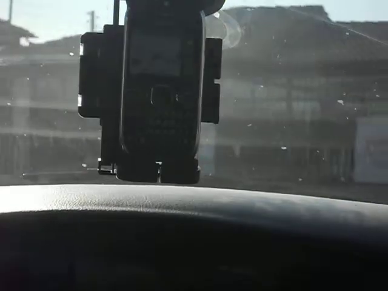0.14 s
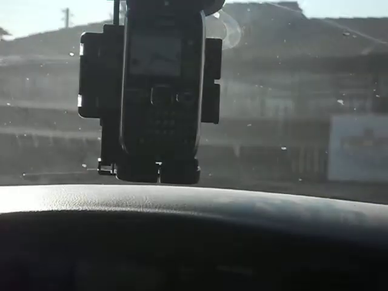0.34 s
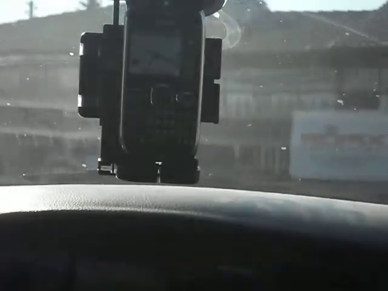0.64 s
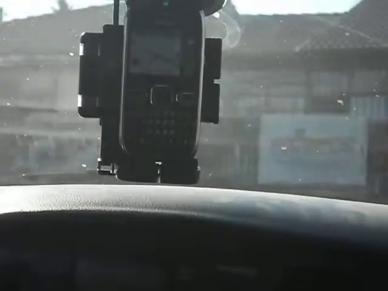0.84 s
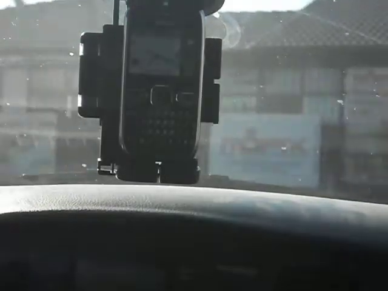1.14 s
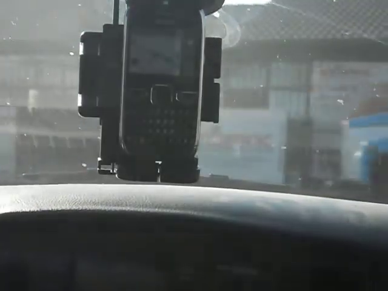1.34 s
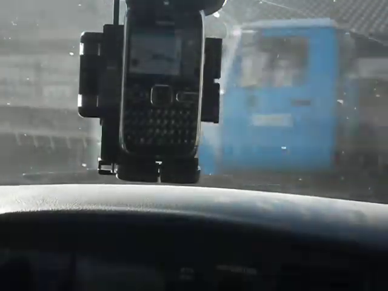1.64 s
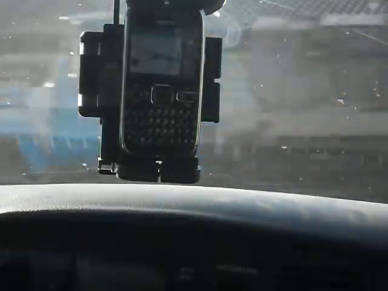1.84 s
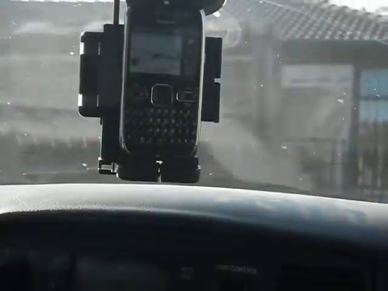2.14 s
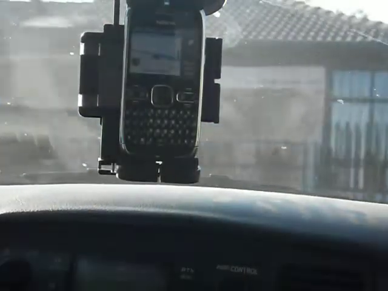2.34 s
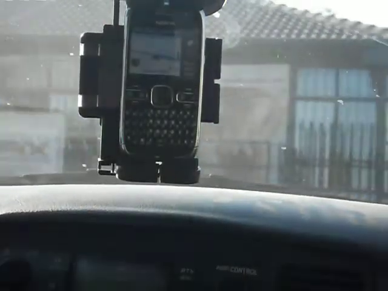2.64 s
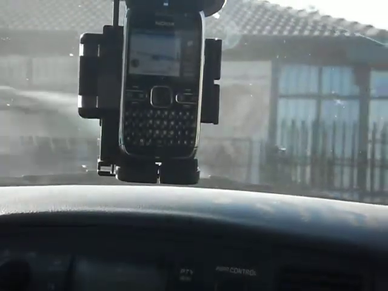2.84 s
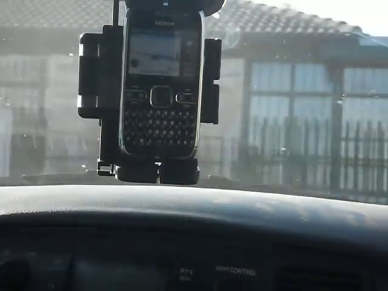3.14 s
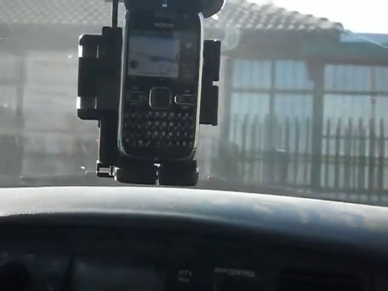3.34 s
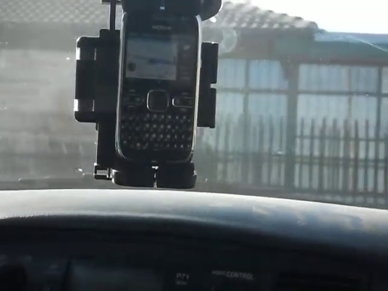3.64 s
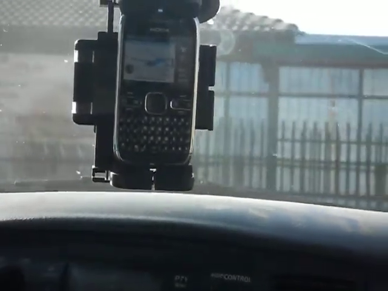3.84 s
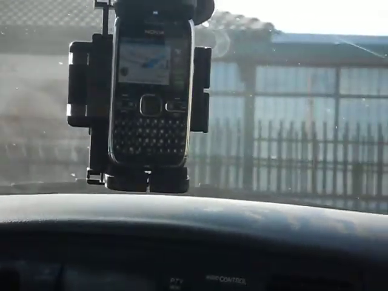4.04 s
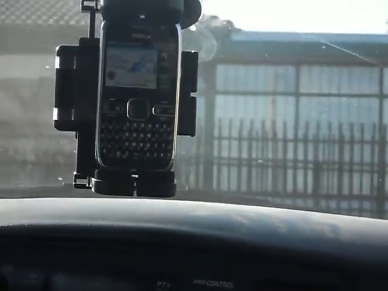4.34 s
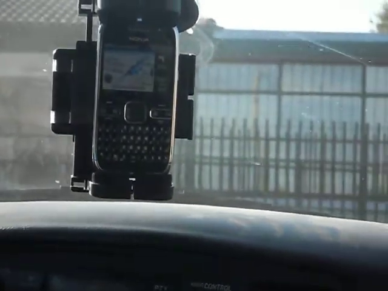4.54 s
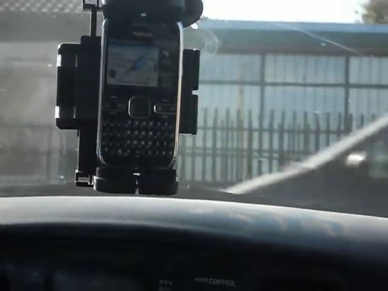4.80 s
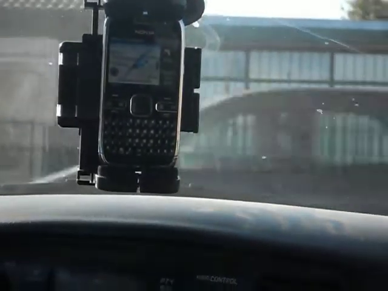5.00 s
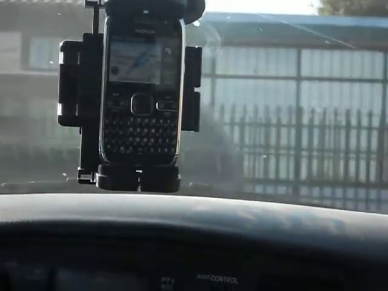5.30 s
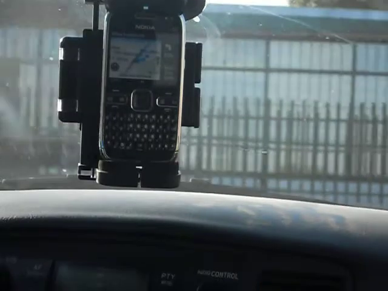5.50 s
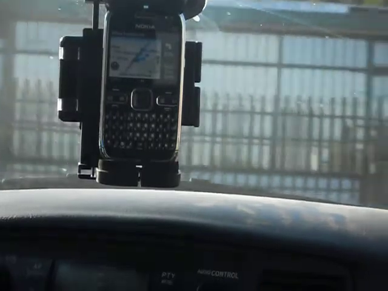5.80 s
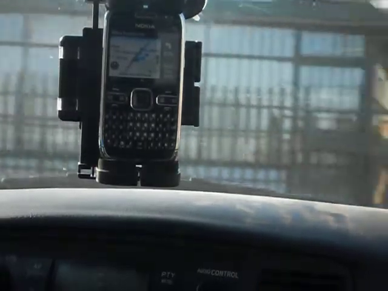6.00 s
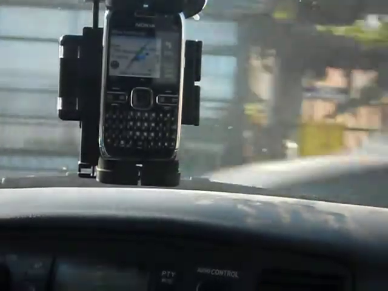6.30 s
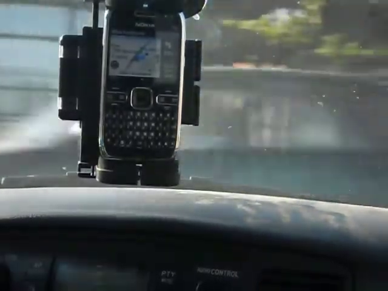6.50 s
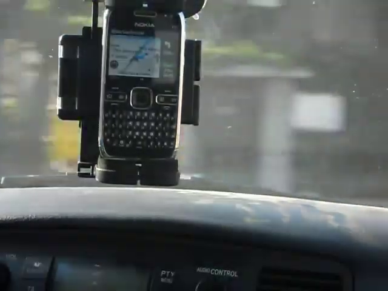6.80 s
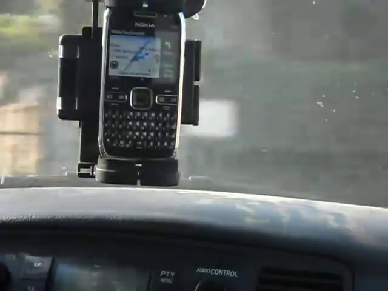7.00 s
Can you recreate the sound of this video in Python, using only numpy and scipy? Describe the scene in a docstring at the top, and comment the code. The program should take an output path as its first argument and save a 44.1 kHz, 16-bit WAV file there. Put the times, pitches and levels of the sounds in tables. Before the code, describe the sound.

Inside a slow-moving car, an engine drones near idle over low road rumble and light tyre hiss. A turn signal ticks faintly and evenly throughout, and small loose things knock about. Dips bring deep thuds in the first second, followed by a suspension thump at 1.3 seconds and a sharp plastic click at 1.7. From about 2 to 4 seconds the ride is at its busiest, with thumps, dashboard taps, flurries of rattles and hollow clonks near 2.9, 3.3 and 3.7 seconds. The engine revs gently from 3 to 3.8 seconds, eases, then pulls harder from 4.5 to about 5.5, where another sharp click sounds. Between 6 and 6.5 seconds a deep engine boom fills the cabin and pushes the overall level down slightly. The engine is climbing again at the end, around 7 seconds.

```python
"""Slow turn on a rough street

Inside a car, a four-cylinder engine lugs near idle, revs twice and booms in the cabin.
The road rumbles through the body and the tyres hiss; the indicator relay ticks on and off.
Bumps thump the suspension and shake clonks, rattles, taps and clicks out of the trim.
An automatic gain control ducks everything when the engine booms, and recovers slowly."""
import sys
import numpy as np
from scipy import signal
from scipy.fft import rfft, irfft, next_fast_len
from scipy.io import wavfile
from scipy.ndimage import map_coordinates

SR = 44100
rng = np.random.default_rng(int(sys.argv[2]) if len(sys.argv) > 2 else 0)


def to_wav(s):
    """Save 16-bit WAV."""
    ch = np.atleast_2d(s).T  # columns
    pcm = np.round(np.clip(ch, -1, 1) * 32767)  # PCM
    wavfile.write(sys.argv[1], SR, pcm.astype(np.int16))


N = 315315

# how rough the street is under the wheels: time_s, unevenness_db
UNEVENNESS = [(0, -1.5), (.6, 4), (1.3, 2.5), (1.75, 0.5), (2.3, 1), (2.9, -2.5), (3.3, 2), (3.8, -4),
              (4.08, -10), (4.3, -4.5), (4.6, -2.5), (5.3, -8.5), (5.9, -0.5), (6.2, 2.5), (7.15, -1)]


def engine():
    """Each firing pushes the cabin air; combustion noise comes through the bulkhead."""
    # engine speed: time_s, firing_hz
    speed = [(0, 25.2), (1.4, 26.6), (2.85, 26.2), (3.05, 28.8), (3.4, 34.8), (3.76, 40), (4.04, 31),
             (4.4, 28.2), (4.82, 40.5), (5.1, 43.8), (5.38, 41.3), (5.6, 37.2), (5.8, 30), (6.05, 27),
             (6.5, 31), (7.15, 37.6)]
    # how hard the engine works: time_s, level_db
    effort = [(0, -40), (.9, -37), (1.8, -39), (2.2, -36), (3.1, -38.5), (3.4, -34), (3.75, -34.5),
              (4.1, -39), (4.35, -37), (4.75, -31.5), (5.3, -31.5), (6.1, -35.5), (6.7, -33.5), (7.15, -30)]
    # low cabin boom at the firing rate, swelling with road jolts early on
    # and as the engine pulls later: time_s, level_db
    boom_envelope = [(0, -25.5), (.22, -10), (.48, -19), (.82, -11.5), (1.1, -24.5), (1.42, -15.5),
                     (1.8, -25.5), (2.2, -27), (2.38, -10), (2.6, -20.5), (2.9, -17), (3.05, -28),
                     (3.45, -13), (3.57, -21), (3.8, -14), (4, -26), (4.13, -14), (4.42, -27.5),
                     (4.8, -11.5), (5.12, -13.5), (5.45, -9.5), (5.97, -24), (6.03, -6.5), (6.4, -0.5),
                     (6.76, -19), (7.15, -9)]
    # tone of the roar: frequency_hz, level_db
    roar_spectrum = [(100, -22), (190, 0), (305, -5), (355, -2), (420, -2.5), (465, 1), (492, 2),
                     (530, 1.5), (610, -5.5), (665, -2.5), (715, -6.5), (775, -0.5), (840, -13),
                     (1100, -25.5), (1700, -15), (2000, -28.5), (5000, -61), (12000, -91)]
    # engine bay resonances: pitch_hz, width_hz, level_db
    bay_modes = [(750, 120, 2), (1239, 63, -1), (1573, 52, -5.5), (1730, 190, -11)]
    firing_hz, = curves(speed)
    effort_db, = curves(effort)
    boom_db, = curves(boom_envelope)
    uneven_db, = curves(UNEVENNESS)
    phase = 2 * np.pi * np.cumsum(firing_hz) / SR
    rev_octaves = np.log2(firing_hz / firing_hz.mean())
    flutter_db = 1.5 * amp(uneven_db) * wobble(8)
    boom = amp(boom_db + flutter_db) * unit(np.sin(phase))
    drone = amp(effort_db - 4 + 6 * rev_octaves) * exhaust(phase, firing_hz)
    # as the revs climb, the surge hardens and the bay rings harder
    growl = combustion(phase, repeat=.35, knock_db=-7 + 5 * rev_octaves)
    roar = amp(effort_db + 3 + .5 * rev_octaves + .22 * wobble(8.1)) * coloured(growl, roar_spectrum)
    bay = unit(resonate(combustion(phase, repeat=.27, knock_db=-3), bay_modes))
    clatter = amp(effort_db - 12.5 + 10 * rev_octaves) * bay
    easing_db = effort_db - effort_db.max()  # the knocks fade twice as fast as the effort
    knocks = amp(effort_db - 8.5 + easing_db) * thrum(phase)
    return boom + drone + roar + knocks + clatter


def exhaust(phase, firing_hz):
    """The exhaust drones; air modes of the cabin lift each overtone that passes through them."""
    # drone partials: firing_multiple, level_db
    partials = [(.5, 10), (1.5, 0), (2, -3), (2.5, -33), (3, -0.5), (3.5, -32), (4, 0.5), (5, -10),
                (6, -16.5)]
    # cabin air modes: pitch_hz, width_hz, lift_db
    air_modes = [(53.4, 9, 6), (104.4, 5, 8), (189, 12, 5.5)]
    out = np.zeros(N)
    for multiple, level_db in partials:
        hz = multiple * firing_hz
        lift_db = sum(db / (1 + ((hz - mode_hz) / width) ** 2) for mode_hz, width, db in air_modes)
        waver_db = 1.4 * wobble(11)  # no two firings are quite alike
        tone = np.sin(multiple * phase + rng.uniform(0, 2 * np.pi) + .18 * wobble(12))
        out += amp(level_db + lift_db + waver_db) * unit(tone)
    return out


def combustion(phase, repeat, knock_db):
    """Combustion noise: a share repeats every four firings, and it surges once a crank turn."""
    cycle = phase / (8 * np.pi) % 1
    crank_turn = phase / (4 * np.pi) % 1
    pattern = map_coordinates(rng.standard_normal(512), [cycle * 512], mode='grid-wrap')
    fresh = wobble(5000)
    surge = 1 + amp(knock_db) * np.exp(-crank_turn / .09)
    firing_pulse = amp(1.3 * np.cos(phase))
    return (np.sqrt(repeat) * pattern + np.sqrt(1 - repeat) * fresh) * surge * firing_pulse


def thrum(phase):
    """Over the four firings of an engine cycle, each knock rings its own panel of the bulkhead."""
    # knocks in one cycle: position_firings, pitch_hz, width_hz, level_db
    panels = [(.3, 1220, 50, -9), (1.3, 492, 55, -.5), (2.8, 772, 65, 2), (1.9, 665, 60, -4),
              (3.0, 360, 50, 6), (3.9, 425, 60, 0), (3.4, 860, 110, -10)]
    out = np.zeros(N)
    for position, hz, width, db in panels:
        cycle_count = np.floor(phase / (8 * np.pi) - position / 4)
        knocks = np.diff(cycle_count, prepend=-1) * amp(1.5 * wobble(11))
        out += amp(db) * band(knocks, hz, width)
    return out


def road():
    """Uneven tarmac shakes the body; the tread crunches grit and hisses steadily."""
    # tone of the body's shudder and rumble, the grit and the tread: frequency_hz, level_db
    shudder_spectrum = [(12, -2), (24, 1.5), (36, -2.5), (48, 5), (61, -1), (76, -6), (130, -17.5),
                        (400, -120)]
    rumble_spectrum = [(45, -28), (78, 3), (92, -2.5), (102, 3), (116, -7), (160, -5.5), (195, -8),
                       (280, -16), (500, -50), (2000, -110)]
    grit_spectrum = [(300, -44), (700, 2.5), (1000, 0), (1400, -4.5), (2000, -7), (3000, -11),
                     (6000, -22.5), (12000, -69)]
    hiss_spectrum = [(500, -0.5), (1700, 3), (3000, 2.5), (4200, 2.1), (6000, 0.5), (8000, 0),
                     (10000, -2.5), (12000, -9)]
    uneven_db, = curves(UNEVENNESS)
    shudder = amp(-20 + uneven_db + 1.2 * wobble(7)) * coloured(noise(), shudder_spectrum)
    rumble = amp(-28.5 + .41 * uneven_db + 1.66 * wobble(14)) * coloured(noise(), rumble_spectrum)
    grit_db = -44 + .11 * uneven_db + 1.34 * wobble(25)
    grit = amp(grit_db) * coloured(noise() * amp(2.5 * wobble(400)), grit_spectrum)
    hiss = amp(-44.5 + .76 * wobble(54)) * coloured(noise(), hiss_spectrum)
    return shudder + rumble + grit + hiss


def bumps():
    """Dips in the road heave the body; potholes thump the suspension."""
    # body heaves: middle_s, level_db, pitch_hz
    heaves = [(.19, -9.5, 51.6), (0.331, -10.5, 51.5), (.74, -16, 50.1), (1.0, -14.5, 56.2),
              (1.26, -10, 48.6), (2.15, -15.5, 59.6), (2.36, -18.5, 57.6), (2.531, -16.5, 56.4),
              (3.2, -14, 54.8), (3.301, -8.5, 28.55), (3.71, -8, 27.4), (4.222, -13.5, 53.7),
              (4.421, -15.5, 56.5), (5.999, -12.5, 52.8)]
    # suspension thumps: start_s, level_db, pitch_hz
    thumps = [(1.324, -11, 145), (2.163, -16, 258), (2.166, -23, 345), (2.168, -20, 150), (2.68, -22, 175),
              (2.872, -15, 132), (2.902, -15, 135), (2.955, -23, 280), (3.02, -26, 290), (3.560, -15, 185),
              (3.70, -20, 185)]
    out = np.zeros(N)
    heave_s = .2013
    t = np.arange(int(heave_s * SR)) / SR
    for middle, db, hz in heaves:
        heave = np.hanning(len(t)) * np.sin(2 * np.pi * (hz * t + rng.random()))
        add(out, middle - heave_s / 2, amp(db) * heave)
    for start, db, hz in thumps:
        thud = contact([(2 * hz, 2 * hz, 0)], chatter_s=.0065, soft_hz=2500)
        add(out, start, amp(db) * (ring(hz, rise_s=.0045) + amp(-11.5) * thud))
    return out


def clonks():
    """A hollow loose part lands with a dull clonk and bounces once, softer and a little higher."""
    # landings: start_s, level_db, pitch_hz
    landings = [(2.873, -16, 540), (2.892, -17, 540), (2.899, -14, 590), (3.3395, -6.5, 615),
                (3.6803, -6, 615)]
    # modes of the hollow part: pitch_multiple, level_db
    modes = [(1, 0), (1.35, -12), (2.25, -26), (2.9, -26)]
    bounce_s, bounce_db, bounce_pitch_ratio = .00815, -6, 1.14
    out = np.zeros(N)
    blow = lambda hz: sum(amp(db) * ring(k * hz, rise_s=.0024, padding=3) for k, db in modes)
    for start, db, hz in landings:
        add(out, start, amp(db) * blow(hz))
        add(out, start + bounce_s, amp(db + bounce_db) * blow(bounce_pitch_ratio * hz))
    return out


def trim():
    """Dashboard plastic taps, clicks and rubs as the body flexes."""
    # taps, each a close pair of modes: start_s, level_db, lower_mode_hz
    taps = [(.751, -28, 900), (1.33, -29, 600), (1.717, -27, 660), (2.231, -26, 800), (2.635, -28, 1080),
            (2.66, -30, 700), (2.874, -29, 1300), (3.080, -30, 620), (3.095, -31, 720), (3.1422, -18, 880),
            (3.564, -22, 780), (3.8635, -27, 850), (4.517, -27, 920)]
    # sharp clicks, each ringing a panel: start_s, level_db, chatter_s, panel_hz, panel_db, panel_rise_s
    clicks = [(1.7152, -8, .003, 1950, -26, .0013), (2.232, -26, .0022, 1450, -31, .0012),
              (2.825, -28.5, .003, 1600, -38, .0018), (3.203, -19, .003, 2700, -34, .0008),
              (3.564, -20, .0009, 2400, -23, .0003), (3.8635, -21, .001, 3000, -21, .0002),
              (4.066, -29, .0035, 1900, -44, .0018), (4.213, -28, .0035, 1900, -50, .0018),
              (4.420, -30, .0035, 1900, -48, .0018), (5.4407, -9, .004, 1820, -20, .0015)]
    # bright ring of a click: pitch_hz, width_hz, level_db
    click_modes = [(2900, 570, -3.5), (4670, 1100, 1), (5530, 720, 3.5), (6450, 570, -3.5),
                   (8700, 1900, -10.5)]
    # trim rubbing on trim: start_s, length_s, level_db
    rubs = [(2.197, 0.049, -42), (2.795, 0.091, -39.5), (2.88, .045, -38), (4.052, 0.056, -36.5),
            (4.23, 0.066, -40), (4.392, 0.056, -38.5), (5.355, 0.095, -39.5), (5.699, 0.2, -43)]
    # tone of a rub: frequency_hz, level_db
    rub_spectrum = [(600, 0), (1500, 1.5), (4000, 1.5), (7000, -1), (11000, -8)]
    out = np.zeros(N)
    for start, db, hz in taps:
        pair = ring(hz, rise_s=.0011) - ring(1.3 * hz, rise_s=.0011)
        clack = contact([(hz, hz, 0)], chatter_s=.0027, soft_hz=4000)
        add(out, start, amp(db) * (pair + amp(-3.5) * clack))
    for start, db, chatter_s, panel_hz, panel_db, rise_s in clicks:
        add(out, start, amp(db - 10) * contact(click_modes, chatter_s, soft_hz=20000))
        add(out, start, amp(panel_db) * ring(panel_hz, rise_s))
    for start, length, db in rubs:
        stroke = np.hanning(int(length * SR))
        slips = (noise() * amp(.74 * wobble(240)))[:len(stroke)]
        add(out, start, amp(db) * stroke * coloured(slips, rub_spectrum))
    return out


def indicator():
    """Once a blink the relay closes and opens again, with a different ring each way."""
    # relay frame modes on closing and on opening: pitch_hz, level_db, rise_s
    closing_modes = [(2925, 1.5, 0.0037), (4114, -7, 0.004), (5270, -4, 0.002), (6250, -6, 0.003),
                     (6750, -2, 0.0022)]
    opening_modes = [(2920, -4.5, 0.0033), (3660, -12, 0.004), (5410, -.3, 0.0024), (8400, -11, .002),
                     (8860, -6.5, 0.002)]
    first_s, period_s, lamp_on_s = .0667, .7077, .3771
    closing_db, opening_db, scatter_db = -37, -35.5, 1
    out = np.zeros(N)
    for start in np.arange(first_s, N / SR, period_s):
        closing = relay_tick(closing_modes, chatter_db=.5, chatter_s=.0035)
        opening = relay_tick(opening_modes, chatter_db=-1.5, chatter_s=.003)
        add(out, start, amp(rng.normal(closing_db, scatter_db)) * closing)
        add(out, start + lamp_on_s, amp(rng.normal(opening_db, scatter_db)) * opening)
    return out


def relay_tick(modes, chatter_db, chatter_s):
    """The armature chatters against its stop and rings the relay frame."""
    # tone of the chattering contacts: frequency_hz, level_db
    chatter_spectrum = [(1800, -19), (2700, 0), (4500, -4.5), (6600, -4.5), (7300, -11), (10000, -11.5)]
    t = np.arange(SR // 15) / SR
    tone = lambda hz: amp(rng.normal(0, 1.2)) * np.sin(2 * np.pi * (hz * t + rng.random()))
    frame = sum(amp(db) * swell(t, rise_s) * tone(hz) for hz, db, rise_s in modes)
    chatter = swell(t, chatter_s) * coloured(rng.standard_normal(len(t)), chatter_spectrum)
    return frame + amp(chatter_db) * chatter


def rattles():
    """Loose things collide in dense, uneven flurries that swell and die after the jolts."""
    # flurries: start_s, length_s, level_db, pitch_hz
    flurries = [(2.13, .1, -35, 480), (2.2, 0.32, -39, 800), (2.552, 0.15, -35.5, 1240),
                (2.617, .18, -35.5, 800), (2.82, .13, -37, 1400), (2.861, 0.088, -28.5, 600),
                (2.941, 0.12, -34, 380), (3.0, .16, -39, 1100), (3.198, 0.25, -32.5, 800),
                (3.319, .1, -30.5, 520), (3.59, 0.186, -34, 640), (3.5, 0.38, -25.5, 205),
                (5.715, 0.078, -36, 1550), (5.785, 0.099, -38, 1190)]
    out = np.zeros(N)
    for start, length, db, hz in flurries:
        envelope = np.hanning(int(length * SR))
        hits = (noise() * amp(3.2 * wobble(200)))[:len(envelope)]
        add(out, start, amp(db) * envelope * band(hits, hz, width_hz=.8 * hz))
    return out


def jiggle():
    """Small things in the cabin knock about at random, harder on uneven road."""
    knocks_per_s, spread_db, low_hz, high_hz = 22, 7, 420, 1206
    out = np.zeros(N)
    uneven_db, = curves(UNEVENNESS)
    for when, softness, height in rng.random((int(knocks_per_s * N / SR), 3)):
        db = -30 + uneven_db[int(when * N)] - spread_db * softness
        hz = low_hz * (high_hz / low_hz) ** height
        add(out, when * N / SR, amp(db) * low_hz / hz * ring(hz, rise_s=.0018))
    return out


def squeak():
    """A piece of trim squeaks faintly as the engine pulls."""
    start_s, length_s, level_db = 4.57, .15, -48
    out = np.zeros(N)
    stroke = np.hanning(int(length_s * SR))
    add(out, start_s, amp(level_db) * stroke * band(noise()[:len(stroke)], hz=3350, width_hz=350))
    return out


def contact(modes, chatter_s, soft_hz):
    """Two parts chatter together for a moment and ring, with little force above soft_hz; peaks at 1."""
    age = np.arange(SR // 15) / SR / chatter_s
    burst = rng.standard_normal(len(age)) * np.sqrt(age) * np.exp(-age)
    force = filtered(burst, lambda hz: (1 + 1j * hz / soft_hz) ** -3.0)
    sound = resonate(force, modes)
    return sound / np.abs(sound).max()


def ring(hz, rise_s, padding=1):
    """A struck part rings up and dies away; more padding is a softer blow."""
    t = np.arange(SR // 15) / SR
    return swell(t, rise_s) ** padding * np.sin(2 * np.pi * hz * t)


def swell(t, rise_s):
    """An envelope that reaches 1 at rise_s, then decays."""
    return t / rise_s * np.exp(1 - t / rise_s)


def amp(db):
    """Decibels to gain."""
    return 10 ** (np.asarray(db) / 20)


def unit(x):
    """Scale to rms 1."""
    return x / np.sqrt(np.mean(x ** 2) + 1e-20)


def curves(rows):
    """One value per sample for each column after the time."""
    times, *columns = np.transpose(rows)
    return [np.interp(np.arange(N) / SR, times, column) for column in columns]


def noise():
    """Fresh white noise."""
    return rng.standard_normal(N)


def wobble(rate):
    """A smooth random curve, rate knots a second."""
    return map_coordinates(rng.standard_normal(int(N * rate / SR) + 4), [np.arange(N) * rate / SR])


def filtered(x, response):
    """x through a frequency response."""
    size = next_fast_len(len(x) + 8192)
    return irfft(rfft(x, size) * response(np.fft.rfftfreq(size, 1 / SR)), size)[:len(x)]


def coloured(x, spectrum):
    """x through an EQ curve of (frequency_hz, level_db) points, at rms 1."""
    points_hz, db = np.transpose(spectrum)
    return unit(filtered(x, lambda hz: amp(np.interp(np.log(hz + 1), np.log(points_hz), db))))


def resonate(x, modes):
    """x through parallel (pitch_hz, width_hz, level_db) resonances of alternating polarity."""
    return filtered(x, lambda f: sum(
        (-1) ** k * amp(db) * 1j * f * width / (hz * hz - f * f + 1j * f * width)
        for k, (hz, width, db) in enumerate(modes)))


def band(x, hz, width_hz):
    """x twice through one resonance, at rms 1."""
    mode = [(hz, width_hz, 0)]
    return unit(resonate(resonate(x, mode), mode))


def add(track, start_s, sound):
    """Mix a sound in at start_s."""
    part = track[max(round(start_s * SR), 0):][:len(sound)]
    part += sound[:len(part)]


def gain_control(x):
    """Turns down quickly when the sound passes the threshold, and creeps back up."""
    threshold_db, cut_per_db, opening_cut_db = -14, .72, 4.5
    attack_s, recovery_db_per_s = .076, 1.5
    pole = np.exp(-1 / (attack_s * SR))
    level_db = 10 * np.log10(signal.lfilter([1 - pole], [1, -pole], x ** 2) + 1e-12)
    needed_db = cut_per_db * np.maximum(level_db - threshold_db, 0)
    recovered_db = recovery_db_per_s * np.arange(N) / SR
    cut_db = np.maximum.accumulate(np.maximum(needed_db + recovered_db, opening_cut_db)) - recovered_db
    return x * amp(-cut_db)


def scene():
    """Everything as heard above the dashboard, in mono."""
    mix = engine() + road() + indicator() + bumps() + clonks() + rattles() + jiggle() + trim() + squeak()
    return mix[None]


def record(dry):
    """The gain control rides the mix, and a steep low-pass takes off the top."""
    top_hz = 10650
    return filtered(gain_control(dry[0]), lambda hz: 1 / np.sqrt(1 + (hz / top_hz) ** 54))[None]


dry = scene()
out = record(dry)
to_wav(out)
```